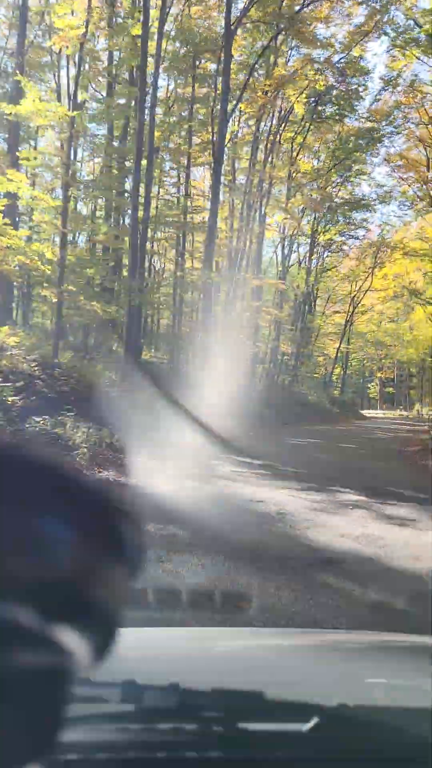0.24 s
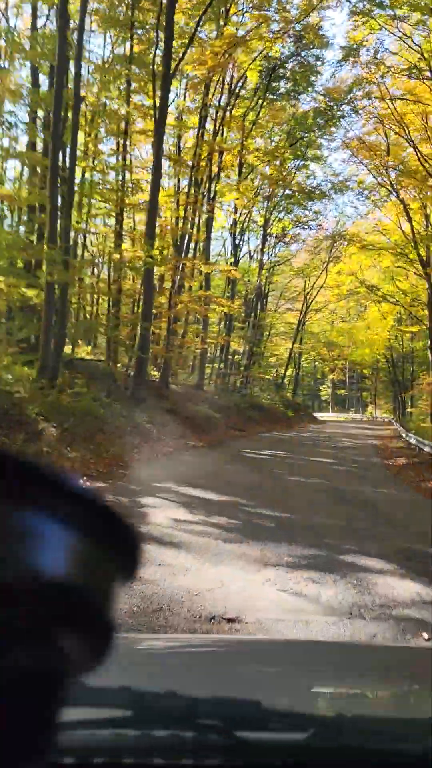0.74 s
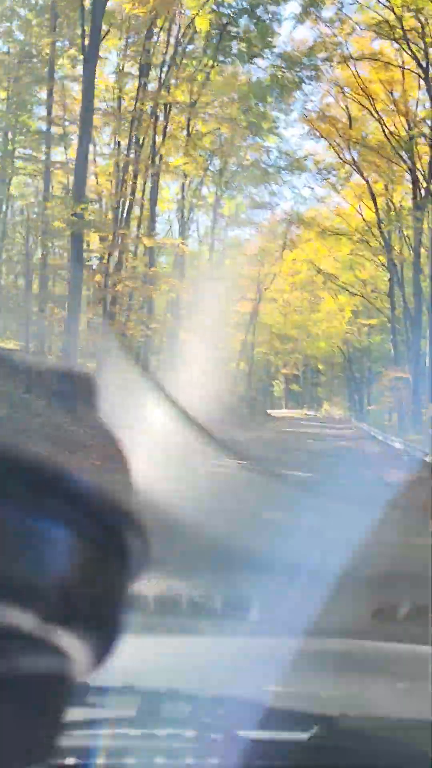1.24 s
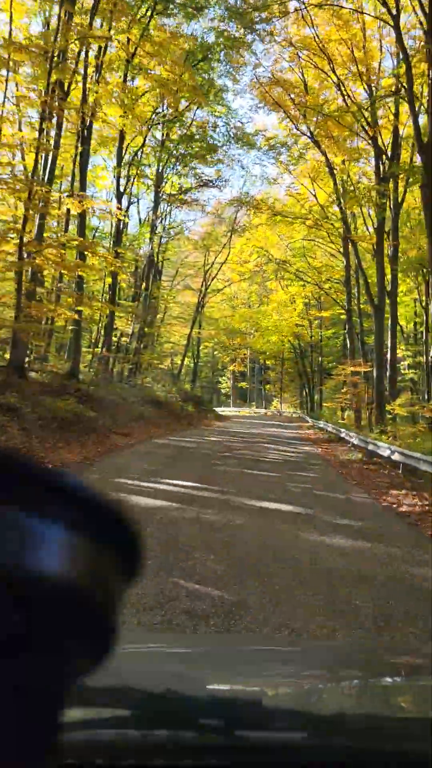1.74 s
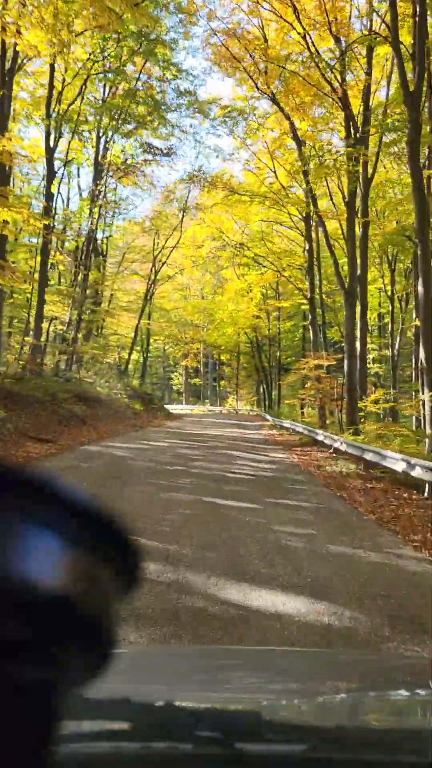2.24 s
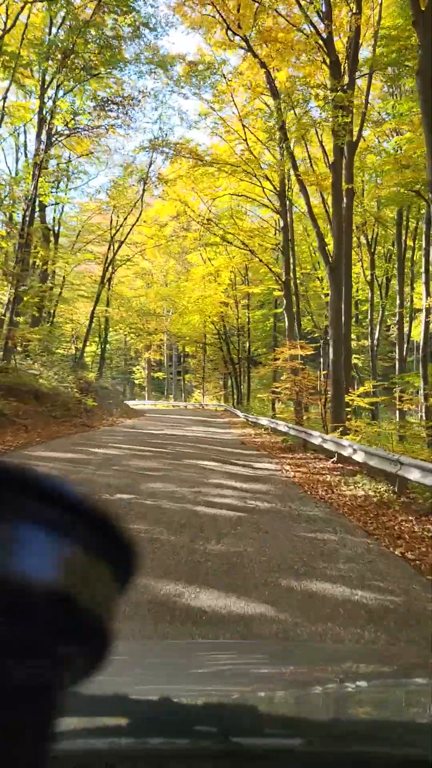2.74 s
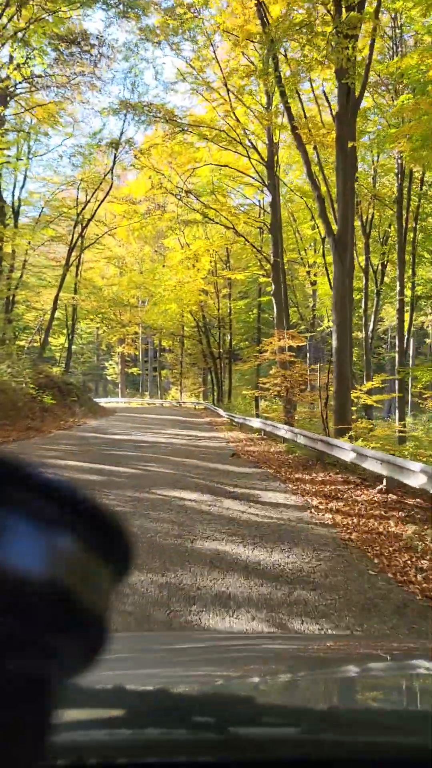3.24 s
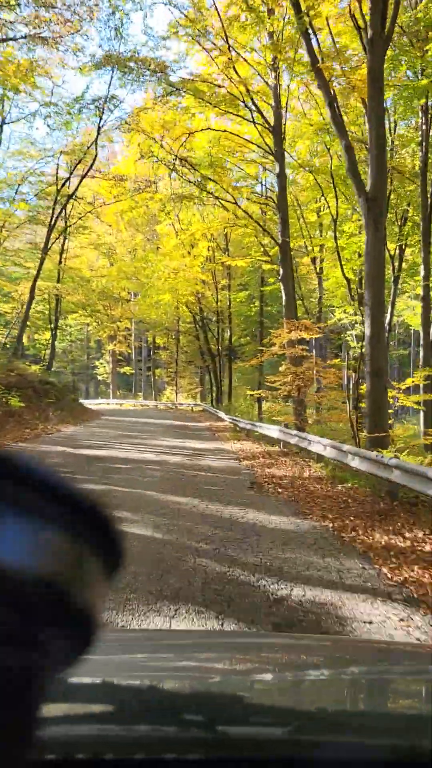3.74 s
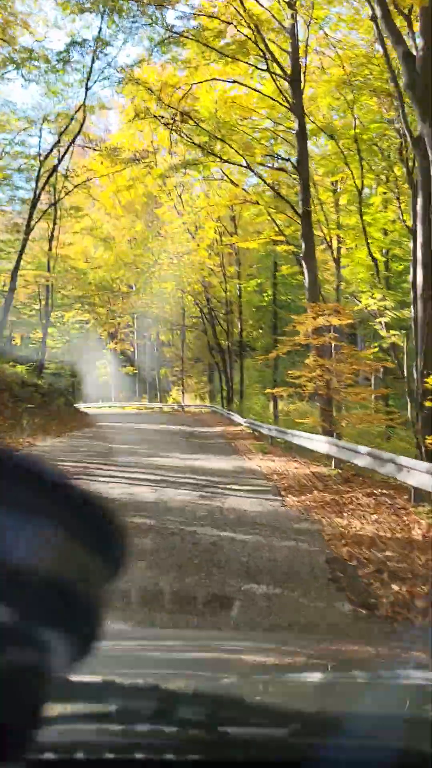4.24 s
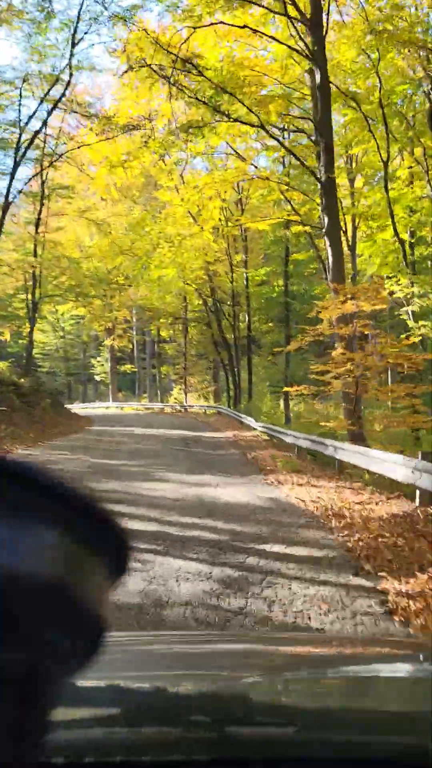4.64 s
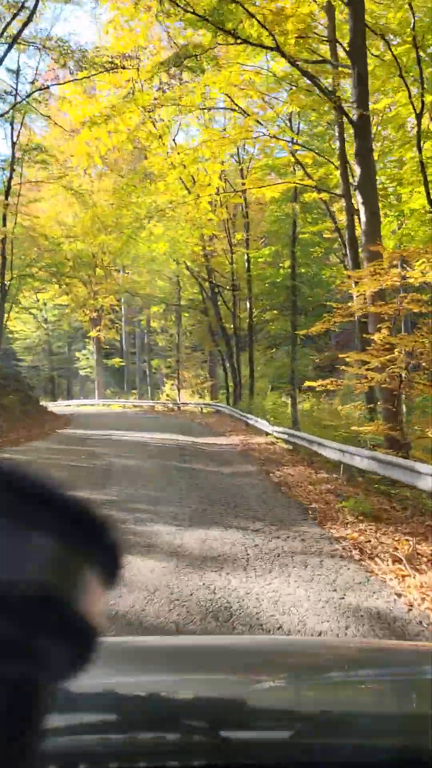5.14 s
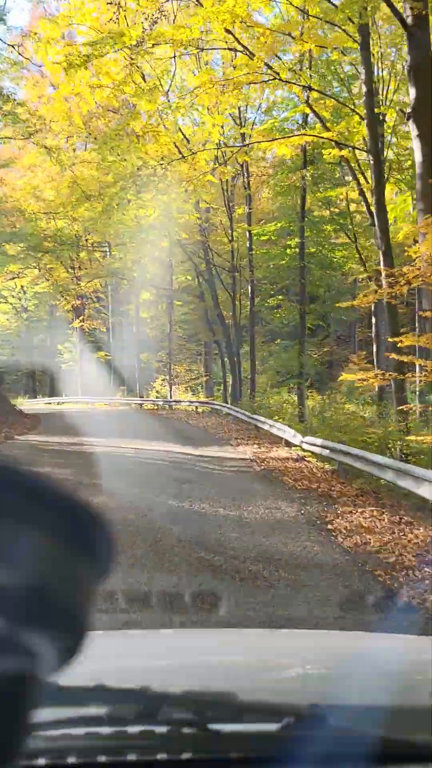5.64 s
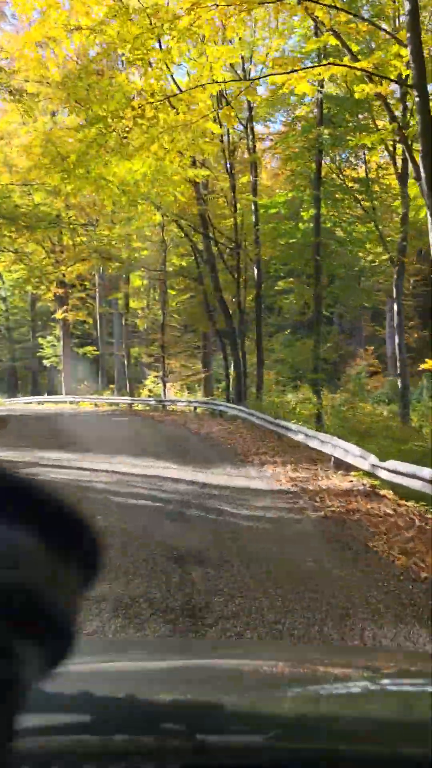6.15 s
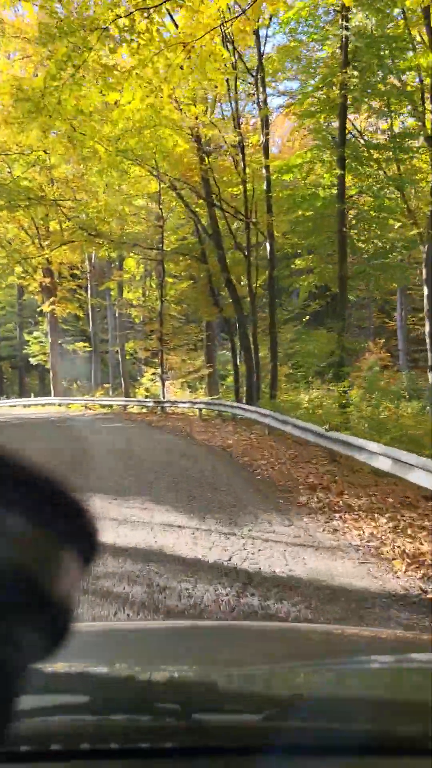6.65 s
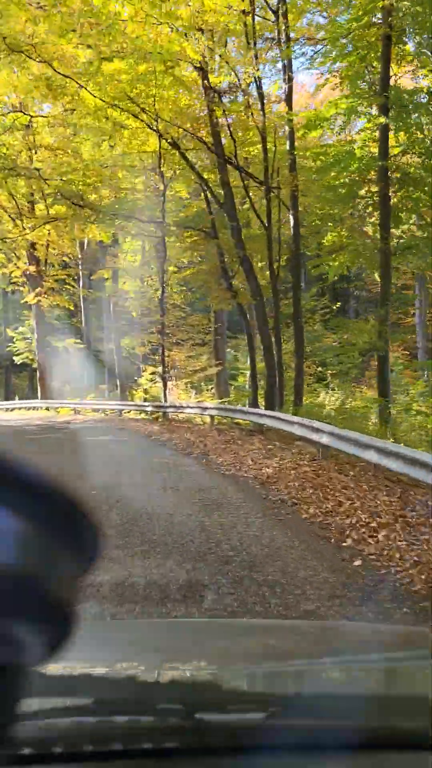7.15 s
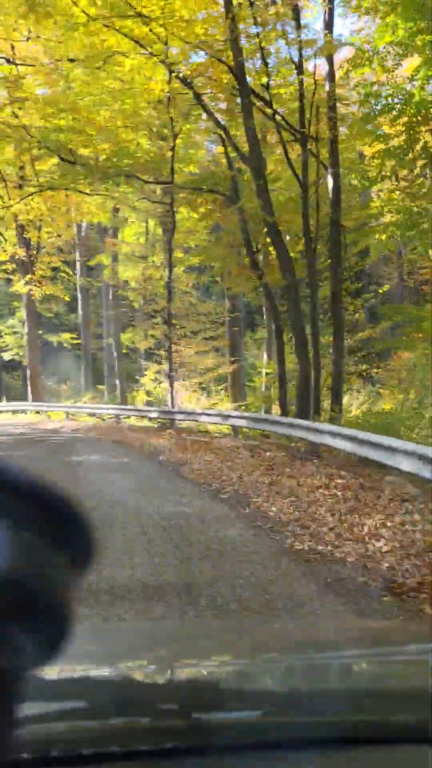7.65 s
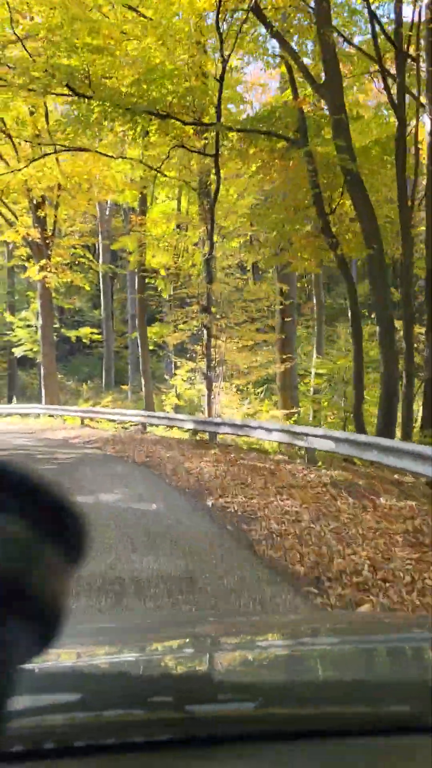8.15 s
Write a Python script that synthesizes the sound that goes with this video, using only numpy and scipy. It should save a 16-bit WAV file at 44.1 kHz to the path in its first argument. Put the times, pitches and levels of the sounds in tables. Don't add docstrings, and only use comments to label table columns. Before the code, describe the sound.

Inside a car on a rough road, deep cabin boom and rumble, with knocks over bumps and a loose trim clip ticking.

```python
import sys
import numpy as np
from scipy import signal
from scipy.fft import irfft
from scipy.io import wavfile
from scipy.ndimage import uniform_filter1d

SR = 44100
rng = np.random.default_rng(int(sys.argv[2]) if len(sys.argv) > 2 else 0)


def volts(x):
    e = np.asarray(x, float) / 20
    return 10 ** e


def log_audio(samples):
    frames = np.atleast_2d(samples).T
    limited = np.clip(frames, -1, 1)
    pcm = np.round(limited * 32767).astype(np.int16)
    wavfile.write(sys.argv[1], SR, pcm)


N = 370440

LAG_S = 17 / 44100
# pitch_hz, left_over_right_db
PORT_LEAN = [(50, 2), (130, 1), (300, -1), (700, 3), (1300, 0.4), (2400, 1.7), (4400, -2), (9000, 3)]


def evened(x):
    return x / np.sqrt(np.mean(x ** 2) + 1e-20)


def smoothed(x, size):
    return uniform_filter1d(uniform_filter1d(x, size), size)


def read(points, hz):
    f, value = np.transpose(points)
    return np.interp(np.log(hz + 1), np.log(f + 1), value)


def colour(points):
    return lambda hz: volts(read(points, hz))


def peak(centre_hz, width_hz):
    return lambda hz: 1 / (1 + (2 * (hz - centre_hz) / width_hz) ** 2)


def add(mix, s, sound):
    part = mix[:, round(s * SR):][:, :sound.shape[1]]
    part += sound[:, :part.shape[1]]


def pair(gain, size, lag_s=0., likeness=0.92):
    # pitch_hz, likeness (0 to 1)
    port_likeness = [(40, 1), (130, 0.93), (290, 0.95), (640, 0.67), (1400, 0.43), (5000, 0.13),
                     (12000, 0.17)]
    hz = np.fft.rfftfreq(size, 1 / SR)
    a, b, c, d = rng.standard_normal((len(hz), 4)).T
    same = np.clip(likeness * read(port_likeness, hz), 0, 1)
    lean = volts(read(PORT_LEAN, hz) / 2)
    right = a + 1j * b
    late_copy = right * np.exp(-2j * np.pi * hz * lag_s)
    left = same * late_copy + np.sqrt(1 - same ** 2) * (c + 1j * d)
    return evened(irfft(np.array([left * lean, right / lean]) * gain(hz), size))


def steadied(x, share, seconds):
    power = smoothed((x ** 2).mean(0), int(seconds * SR))
    return evened(x / (abs(power) + 0.018) ** (np.clip(share, 0, 1) / 2))


def flicker(db, seconds):
    return volts(db * evened(smoothed(rng.standard_normal(N), int(seconds * SR))))


def wandering(centre_hz, drift_hz, width_hz, share, seconds):
    drift = drift_hz * evened(smoothed(rng.standard_normal(N), 4000))
    hz = centre_hz + drift
    band = steadied(pair(peak(hz.mean(), width_hz), N, likeness=1.05), share, seconds)
    return (signal.hilbert(band) * np.exp(2j * np.pi * np.cumsum(hz - hz.mean()) / SR)).real


def bumps(rows, height):
    t = np.arange(0, N + 64, 64) / SR
    total = sum(height(db) * np.exp(-(2 * (t - s) / length_s) ** 2) for s, db, length_s in rows)
    return np.interp(np.arange(N) / SR, t, total)


def shake():
    # time_s, shake_db
    surface = [(0.0, -26.5), (0.23, -28), (0.93, -27), (1.24, -30.5), (1.61, -31.5), (2.03, -32.5),
               (3.02, -32.5), (3.25, -28.5), (4.0, -26), (4.26, -26.5), (4.72, -32), (5.4, -32.5),
               (5.71, -31), (5.85, -28), (6.32, -29), (6.46, -28.5), (6.97, -28), (8.4, -29.5)]
    # time_s, extra_shake_db,
    # length_s
    heaves = [(0.105, -1, 0.029), (0.438, 4.5, 0.095), (0.932, 8, 0.091), (1.131, 3, 0.053),
              (1.558, 8, 0.36), (3.659, 2.5, 0.15), (4.208, 13.5, 0.098), (4.3, 3, 0.077), (4.46, 7, 0.2),
              (6.14, 3, 0.083), (.35, 3.5, 0.06), (.73, 4.5, 0.051), (4.26, -2, .05), (4.5, 2, .05),
              (3.0, 4.5, 0.11), (6.7, 2.5, 0.094), (1.4, 2.5, 0.14), (1.19, 5.5, 0.16), (1.04, 2, .09),
              (.25, -2.5, .1), (.61, -2.5, .1), (4.385, -3.5, .04), (.955, 2.5, .03), (5.55, -2.5, .15),
              (1.3, 3, 0.1), (6.58, 2, 0.11), (7.0, 1.5, .15), (8.27, -0.5, .1), (5.09, 3, 0.092),
              (5.377, 6, 0.06), (5.966, 4, 0.23), (6.231, 7, 0.1), (7.256, 3, 0.14), (7.6, 5, 0.56),
              (8.03, 4.5, 0.063), (8.157, 6.5, 0.045)]
    calm_db = -34
    s, surface_db = np.transpose(surface)
    return np.interp(np.arange(N) / SR, s, surface_db) - calm_db, bumps(heaves, float)


def grown(calm_db, slope, shake_db):
    return volts(calm_db + slope * shake_db)


def cabin_boom():
    # time_s, level_db, length_s
    boom_swells = [(.13, -17.5, 0.047), (.36, -14, 0.12), (.48, -11, 0.081), (.62, -11.5, 0.059),
                   (.97, -12.5, 0.1), (1.12, -8.5, 0.035), (1.24, -12.5, 0.2), (1.6, -15, 0.18),
                   (1.76, -21, 0.071), (1.91, -16.5, 0.2), (2.31, -19, 0.072), (2.73, -13, 0.042),
                   (2.97, -20, 0.045), (3.09, -19, 0.086), (3.28, -22, 0.064), (3.66, -14.5, 0.33),
                   (3.88, -18.5, 0.06), (4.19, -9, 0.052), (4.36, -12.5, 0.091), (4.49, -10, 0.11),
                   (4.73, -16.5, 0.13), (5.26, -17, 0.085), (5.4, -13.5, 0.12), (5.8, -17.5, 0.36),
                   (6.01, -10, 0.086), (6.29, -10, 0.2), (6.68, -14.5, 0.35), (7.1, -15, 0.32),
                   (7.69, -15, 0.17), (8.05, -8, 0.022)]
    road_db, _ = shake()
    note = wandering(50.16, drift_hz=1.6, width_hz=3.8, share=0.67, seconds=0.037)
    between_swells = grown(-30, 0.3, road_db)
    return np.hypot(between_swells, bumps(boom_swells, volts)) * note


def floor_drum():
    # pitch_hz, density_db (per Hz)
    drum_colour = [(15, -12), (30, -14), (40, 0.5), (64, -1), (74, -0.5), (82, -6), (89, 2), (103, -6),
                   (113, -10.5), (123, -4.5), (137, -10), (150, -16), (170, -26.5), (400, -130)]
    road_db, heave_db = shake()
    drum = steadied(pair(colour(drum_colour), N, likeness=1.032), share=0.67, seconds=0.059)
    return grown(-24.5, 1, road_db + 0.36 * heave_db) * drum


def tyre_hum():
    # time_s, level_db, length_s
    tyre_swells = [(0.13, -36, 0.098), (0.55, -30.5, 0.093), (0.91, -35.5, 0.54), (1.42, -38, 0.42),
                   (1.84, -43, 0.075), (2.1, -38, 0.13), (2.64, -42, 0.11), (2.9, -40, 0.14),
                   (3.35, -36.5, 0.12), (3.81, -33.5, 1.1), (4.18, -36.5, 0.093), (4.94, -37.5, 0.14),
                   (5.3, -40, 0.13), (6.0, -35, 0.24), (6.4, -37, 0.55), (6.86, -35, 0.099),
                   (7.16, -36, 0.26), (7.51, -37, 0.084), (7.97, -36.5, 0.11)]
    note = wandering(249.7, drift_hz=1.5, width_hz=5.0, share=0.73, seconds=0.05)
    return volts(-3.0) * bumps(tyre_swells, volts) * note


def floor_thuds():
    # time_s, level_db, pitch_hz
    thud_events = [(0.458, -17.5, 90.3), (0.522, -25, 131.2), (0.541, -20, 101.6), (0.579, -16, 82.2),
                   (0.83, -25, 92.5), (0.941, -30, 104.3), (1.18, -16, 94.4), (1.63, -27, 92.5),
                   (3.45, -27, 100.3), (3.588, -22.5, 87.2), (3.8, -23, 120.7), (3.802, -20, 83),
                   (3.88, -24, 122.6), (4.02, -25, 94.6), (4.17, -12.5, 82.2), (4.27, -29, 87.6),
                   (4.43, -14, 89.1), (4.978, -22, 84.6), (6.06, -17, 72.5), (6.23, -23, 78.7),
                   (6.33, -16, 77.7), (6.41, -18.5, 90), (6.572, -21.5, 74.2), (6.81, -13, 77),
                   (6.98, -21, 94.8), (7.098, -13.5, 83.2), (7.25, -17, 73), (7.358, -14.5, 66.5),
                   (7.45, -13.5, 78.5), (7.541, -16.5, 78), (7.66, -20, 86.7), (7.75, -24.5, 102.7),
                   (7.901, -18.5, 77.2), (8.1, -12.5, 74)]
    length_s = 0.08
    out, t = np.zeros((2, N)), np.arange(-4096, 4096) / SR
    for (s, db, hz), phase in zip(thud_events, rng.random(len(thud_events))):
        wave = np.exp(-(2 * t / length_s) ** 2) * np.sin(2 * np.pi * (hz * t + phase))
        port_db = np.array([[0.5], [-0.5]]) * read(PORT_LEAN, hz)
        add(out, s + t[0], volts(db + 2.5 + port_db) * wave)
    return out


def body_roar(grain):
    # pitch_hz, density_db (per Hz)
    roar_colour = [(85, -22), (145, -5), (182, -5.5), (254, -6.5), (281, -8.5), (344, -14.5), (378, -18),
                   (549, -23.5), (608, -26), (667, -29), (790, -25.5), (1100, -44.5), (1430, -67),
                   (2420, -120)]
    # pitch_hz, width_hz, level_db (over the roar)
    hums = [
        (250.6, 13, -13),
        (341, 16, -20),
        (608, 56, -22.5),
        (800, 290, -30),
    ]
    road_db, heave_db = shake()
    roar = steadied(pair(colour(roar_colour), N), share=0.6, seconds=0.053)
    for hz, width_hz, db in hums:
        roar = roar + volts(db) * steadied(pair(peak(hz, width_hz), N), share=0.39, seconds=0.11)
    return grown(-40.5, 1.044, road_db + 0.61 * heave_db) * evened(roar) * grain ** 0.62


def panel_buzz(grain):
    # pitch_hz, density_db (per Hz)
    buzz_colour = [(530, -13.5), (900, -1), (1300, -4.5), (1740, -9.5), (1890, -9), (2400, -16.5),
                   (3300, -19), (4200, -35), (8000, -80.5)]
    fizz_colour = [(2000, -44.5), (3500, 4.5), (4260, 1), (5740, -0.5), (7400, -8.5), (8200, -18.5),
                   (11800, -16), (15700, -19.5)]
    # pitch_hz, width_hz, level_db (on a smooth stretch)
    trim_notes = [
        (1900, 120, -79.5),
        (3710, 250, -84),
    ]
    road_db, heave_db = shake()
    buzz = grown(-60.5, 1.136, road_db + 0.92 * heave_db) * pair(colour(buzz_colour), N, LAG_S)
    fizz = grown(-80.5, 1.68, road_db + 0.9 * heave_db) * pair(colour(fizz_colour), N, LAG_S)
    rattle = (buzz * flicker(1.2, 0.05) + fizz * flicker(1.1, 0.025)) * grain
    notes = np.zeros((2, N))
    for hz, width_hz, db in trim_notes:
        notes += grown(db, 0.7, road_db) * pair(peak(hz, width_hz), N, LAG_S)
    return rattle + notes * flicker(3.5, 0.04)


def dashboard_knocks():
    # time_s, peak_db, treble_db
    knock_events = [(0.867, -35, -19), (0.931, -41, -36), (0.938, -27.5, -40), (0.946, -33, -25),
                    (0.959, -33, -35), (1.046, -39, -19.5), (1.067, -36.5, -19.5), (1.101, -34.5, -26.5),
                    (1.131, -32, -30.5), (1.273, -37, -41.5), (3.027, -42, -43.5), (3.654, -36.5, -34.5),
                    (3.69, -48, -32.5), (4.184, -29, -40), (4.206, -29.5, -24), (4.221, -19, -27.5),
                    (4.235, -33, -25), (4.259, -38.5, -15.5), (4.275, -38.5, -16.5), (4.34, -40.5, -23),
                    (4.635, -43, -31), (6.382, -46, -34.5), (4.419, -37, -32), (4.446, -32, -35),
                    (5.335, -47.5, -36), (5.967, -30.5, -29), (5.992, -32, -25), (7.553, -36, -30.5),
                    (7.621, -41.5, -28), (7.672, -35.5, -41.5), (8, -32, -25)]
    # pitch_hz, level_db
    dash_colour = [(250, -12), (500, 13.5), (1000, 6.5), (2000, -6.5), (2800, -8), (4500, -16.5),
                   (6200, -17.5), (8000, -30)]
    treble_colour = [(6000, -38.5), (8000, -5.5), (10000, -8.5), (13000, -2.5), (15500, -3.5)]
    ring_t60_s, top_t60_s, rise_s = 0.14, 0.15, 0.0006
    out, t = np.zeros((2, N)), np.arange(4096) / SR
    for s, db, treble_db in knock_events:
        thud = pair(colour(dash_colour), len(t), LAG_S)
        top = pair(colour(treble_colour), len(t), LAG_S, likeness=1.3)
        top = top * volts(treble_db + 1.5 - 60 * t / top_t60_s)
        fall = volts(db - 5.5 - 60 * t / ring_t60_s)
        add(out, s, fall * (thud + top) * (1 - np.exp(-t / rise_s)))
    return out


def plastic_snaps():
    # time_s, peak_db, pitch_hz, t60_s
    snap_events = [(0.9257, -43, 5370, 0.014), (0.9365, -20.5, 897, 0.014), (0.9664, -30, 2620, 0.0064),
                   (1.0661, -35, 3380, 0.0063), (1.133, -40.5, 4500, .012), (1.268, -36, 2820, 0.008),
                   (1.398, -47.5, 3200, .03), (1.459, -47.5, 3270, .03), (1.528, -47, 3260, 0.038),
                   (2.597, -42.5, 1360, 0.079), (3.417, -41, 1244, .03), (3.566, -51.5, 4370, .02),
                   (4.2234, -29.5, 2700, 0.023), (4.238, -30.5, 3010, 0.013), (5.0564, -51, 1120, .02),
                   (6.876, -54.5, 1110, .02), (7.54, -30.5, 560, .05), (7.671, -27.5, 782, 0.026),
                   (7.74, -36, 607, 0.069), (7.977, -41.5, 905, .02), (8.03, -36, 604, .06),
                   (5.336, -46, 900, .02), (1.101, -41.5, 900, .02)]
    second_mode = 1.62
    port_gain = volts(np.array([[-2.5], [1.5]]))
    out, t = np.zeros((2, N)), np.arange(2048) / SR
    t = np.maximum(t - np.array([[LAG_S], [0]]), 0)
    for s, db, hz, t60_s in snap_events:
        wave = np.sin(2 * np.pi * hz * t) + 0.15 * np.sin(2 * np.pi * second_mode * hz * t)
        crack = pair(lambda f: peak(1.5 * hz, 2.5 * hz)(f) ** 2, 2048, LAG_S, likeness=1.4)
        crack = crack * volts(-9.5 - 60 * t / 0.018) * (t > 0)
        add(out, s, volts(db - 1.5) * (volts(-60 * t / t60_s) * wave + crack) * port_gain)
    return out


def clip_chatter():
    # time_s, peak_db, dull_body_db
    tick_events = [(0.0433, -67.5, 4.5), (0.0892, -59.5, 1), (0.1101, -62, 5.5), (0.1316, -60.5, 3),
                   (0.1553, -59.5, -3), (0.3187, -59.5, -2.5), (0.3374, -57.5, 2.5), (0.3612, -54.5, -1),
                   (0.402, -65, 4), (0.4179, -62, 6), (0.4674, -61, 9), (0.5666, -56, -4.5),
                   (0.627, -62, -1), (0.6456, -61.5, 0.5), (0.6712, -60.5, 1), (0.6951, -58, 5),
                   (0.721, -52, 5), (0.7461, -50, -4), (0.809, -53, -2.5), (0.847, -56, 8.5),
                   (0.8655, -55, 2.5), (0.898, -52.5, -0.5), (0.9267, -49, 1.5), (0.9486, -54, 11.5),
                   (0.9998, -53, -4.5), (1.022, -56.5, 2.5), (1.067, -51.5, 2), (1.1334, -54, -1),
                   (1.1932, -56.5, 1), (1.2276, -65, 8), (1.2501, -60, 11), (1.294, -59.5, 1.5),
                   (1.3139, -56.5, -1.5), (1.3358, -60, 10.5), (1.3588, -58.5, 5.5), (1.4099, -65, 9.5),
                   (1.464, -62, 10), (1.508, -61.5, 11), (1.5505, -60, 2), (1.5686, -59, 5.5),
                   (1.6786, -60.5, -3), (1.702, -54.5, -3), (1.8053, -60.5, -3), (1.8506, -66, 2),
                   (1.8682, -62, -2.5), (1.8916, -64, 0.5),
                   (2.103, -71.5, 2.5), (2.1279, -68, 4.5), (2.2658, -64, -2.5), (2.2821, -59.5, -0.5),
                (2.325, -65, -1), (2.5579, -65, 0.5), (2.578, -64, 2), (2.6391, -70, 6.5),
                (2.6626, -70.5, 13.5), (2.7325, -69.5, 8.5), (2.759, -69, 3.5), (2.843, -74.5, 7.5),
                (2.89, -71, 11), (2.961, -64.5, -4), (2.9807, -59, -0.5), (3.0566, -60, -1),
                (3.0982, -65, 4.5), (3.1373, -64.5, 3.5), (3.2432, -66.5, 3), (3.26, -56.5, -2),
                (3.418, -71.5, 12.5), (3.4556, -70, 14.5), (3.5467, -61, 6), (3.5662, -67, 10),
                (3.5958, -66.5, 12.5), (3.6396, -55.5, 2.5), (3.6613, -57.5, 1.5), (3.6867, -56.5, 5),
                (3.7898, -67.5, 8), (3.8234, -61.5, 7), (3.847, -63.5, 9), (3.8786, -68, 14.5),
                (3.907, -54, 3.5), (3.9532, -63, 10), (3.9807, -65, 6), (3.9992, -63, 2),
                (4.0311, -55, -4.5), (4.0501, -53.5, 0), (4.1154, -63, 6.5), (4.1414, -57, 4.5),
                (4.1618, -53, 5), (4.1807, -52, 11), (4.2233, -45, 11.5), (4.308, -57, 7),
                (4.3408, -56.5, 2.5), (4.417, -57.5, 7.5), (4.441, -55, 3.5), (4.47, -62, 9),
                   (4.5896, -65, 6.5), (4.6063, -59.5, 1), (4.629, -65, 5), (4.7131, -62, 6),
                   (5.0495, -63.5, 1), (5.0768, -63.5, 3.5), (5.104, -67, 3.5), (5.1255, -62, 1.5),
                   (5.186, -64.5, 4), (5.2716, -65, 4.5), (5.2957, -68, 9.5), (5.3125, -61, 3),
                   (5.3506, -67.5, 11.5), (5.3772, -62, 8.5), (5.4626, -59, -4.5), (5.541, -73, 5.5),
                   (5.5879, -72, 8), (5.63, -69, 8), (5.766, -66, 6.5), (5.8448, -54.5, 1),
                   (5.8693, -57, 5), (5.8882, -56, 1.5), (5.9131, -60.5, 3.5), (5.9311, -63, 4.5),
                   (5.951, -57.5, 6.5), (5.9675, -54.5, 5), (5.9903, -52.5, 1.5), (6.0185, -55.5, 0.5),
                   (6.0494, -60.5, 6.5), (6.0743, -57, -2), (6.092, -51.5, 2.5), (6.1362, -54, 0.5),
                   (6.1614, -55.5, 5.5), (6.1863, -63, 9), (6.2272, -57, 5.5), (6.2454, -51.5, -5.5),
                   (6.285, -58.5, 9), (6.3113, -56, -2), (6.3382, -65, 6), (6.3764, -56.5, -4),
                   (6.403, -61.5, -2), (6.418, -59.5, 7), (6.4933, -57.5, 1), (6.5107, -55.5, -5.5),
                   (6.5517, -58, 0.5), (6.5754, -56, 1), (6.595, -55.5, 0), (6.624, -59, 7.5),
                   (6.7, -51, 0), (6.7198, -55.5, 3), (6.76, -58.5, 7.5), (6.7882, -57, 5),
                  (6.8083, -58.5, 4), (6.8326, -59, 2.5), (6.8783, -68, 12.5), (6.9133, -61.5, 5.5),
                  (6.9514, -58, 1.5), (6.9749, -54.5, 2.5), (6.999, -57.5, 5), (7.0408, -66.5, 11.5),
                  (7.0635, -64, 9), (7.0824, -58, 2.5), (7.108, -52.5, 0.5), (7.13, -57, 3),
                  (7.1621, -65, 8.5), (7.1853, -60.5, 2), (7.234, -56.5, 2), (7.257, -51.5, 2.5),
                  (7.2859, -51.5, -1.5), (7.3198, -65.5, 7.5), (7.3385, -59.5, 3.5), (7.3667, -56.5, 2),
                  (7.3896, -55.5, 8.5), (7.4145, -59.5, 4), (7.4513, -59.5, 2), (7.476, -56, 4.5),
                  (7.5004, -60, 2.5), (7.525, -56, -0.5), (7.5473, -53, 3.5), (7.5733, -57.5, -3),
                  (7.5942, -51, -1.5), (7.6226, -49.5, -2.5), (7.6492, -55, 0.5), (7.672, -53.5, 3),
                  (7.6971, -58, 3), (7.7214, -55.5, 4), (7.7404, -54.5, 2.5), (7.7643, -54, -2),
                  (7.7848, -49, -4), (7.8105, -62, 7), (7.8481, -51.5, -2.5), (7.9164, -58.5, 2.5),
                  (7.9744, -53.5, 1.5), (7.9962, -51.5, 0.5), (8.0207, -56.5, 6), (8.1075, -66.5, 1.5),
                  (8.1196, -61.5, 2), (8.1399, -55, -0.5), (8.1652, -59, 7), (8.1912, -56, 3),
                  (8.2218, -63, 6.5), (8.2439, -65.5, 8), (8.2692, -68, 13), (8.3571, -70.5, 18)]
    clip_modes = [(4500, 220, -9.5), (5200, 160, -3), (5720, 81, 5), (6020, 120, -3.5), (6150, 260, -10),
                  (6770, 1100, -6.5), (9200, 300, -17), (11000, 500, -18), (11700, 400, -15),
                  (13500, 2000, -25)]
    # pitch_hz, level_db
    burst_colour = [(600, -29), (1200, -1), (2000, 1.5), (3200, -7.5), (4500, -7), (7500, -21), (9000, -31),
                    (15500, -30)]
    mode_spread_db, note_spread_hz = 2.5, 150
    core_low_hz, core_high_hz, hard_db, opening = 5000, 6200, -50, 0.56
    outer = np.array([not core_low_hz < mode[0] < core_high_hz for mode in clip_modes])

    out, t = np.zeros((2, N)), np.arange(3072) / SR
    late = t - np.array([[LAG_S], [0]])
    rise = 1 - np.exp(-t / 0.00052)
    ring_fall = volts(-60 * t / 0.05)
    note_shape = volts(1.5 - 60 * t / 0.05) * (1 - np.exp(-t / 0.003))
    for s, db, body_db in tick_events:
        lifts_db = mode_spread_db * rng.standard_normal(len(clip_modes))
        lifts_db = lifts_db + outer * opening * min(db - hard_db, 0)

        def modes(hz):
            return sum(volts(mode_db + lift_db) * peak(mode_hz, width_hz)(hz)
                       for (mode_hz, width_hz, mode_db), lift_db in zip(clip_modes, lifts_db))

        ring = evened(pair(modes, len(t), LAG_S, likeness=1.3) * ring_fall)
        turns = 2 * np.pi * (5700 + note_spread_hz * rng.standard_normal()) * late
        note = np.sin(turns)
        note = note + volts(lifts_db[1] - 5.0) * np.sin(0.935 * turns)
        note = note + volts(lifts_db[3] - 5.0) * np.sin(1.065 * turns)
        burst_fall = volts(3.0 + 0.69 * body_db - 60 * t / 0.064)
        burst = pair(colour(burst_colour), len(t), LAG_S) * burst_fall
        add(out, s, volts(db) * (note * note_shape + volts(-14.0) * ring + burst) * rise)
    return out


def scene():
    grain = flicker(1.9, 0.012)
    low = cabin_boom() + floor_drum() + tyre_hum() + floor_thuds()
    shell = body_roar(grain) + panel_buzz(grain)
    return low + shell + dashboard_knocks() + plastic_snaps() + clip_chatter()


def top_cut(x):
    return signal.sosfilt(signal.butter(12, 15820, fs=SR, output="sos"), x)


def record(dry):
    # pitch_hz, density_db (per Hz)
    hiss_colour = [(2000, -30.5), (4000, 2), (7500, -6), (8300, -13), (15700, -10.5)]
    knee, room = 0.6, 0.42
    wet = dry + volts(-87.5) * pair(colour(hiss_colour), N, likeness=0.23)
    over = np.maximum(abs(wet) - knee, 0)
    wet = wet - np.sign(wet) * (over - room * np.tanh(over / room))
    return top_cut(wet)


dry = scene()
out = record(dry)
log_audio(out)
```